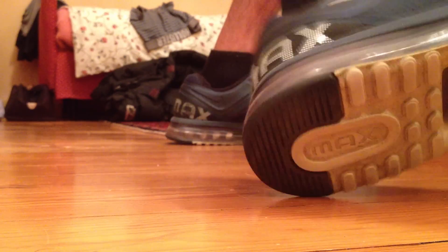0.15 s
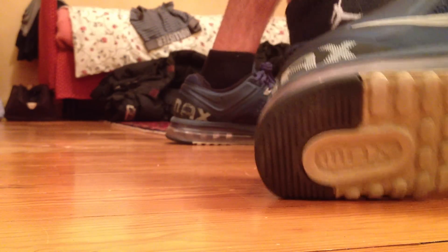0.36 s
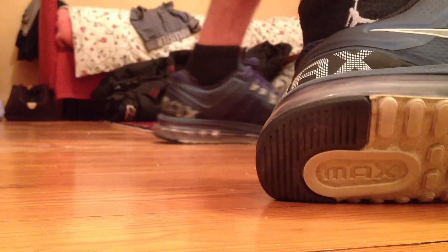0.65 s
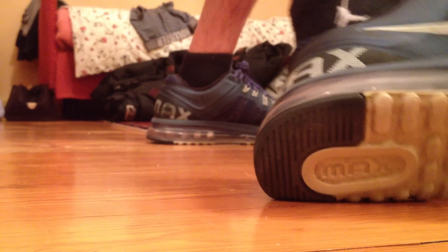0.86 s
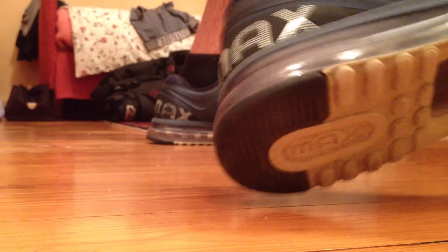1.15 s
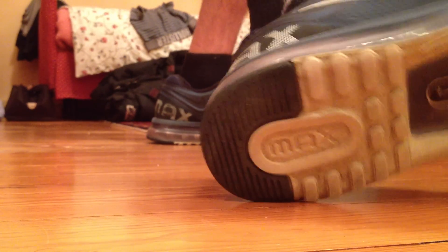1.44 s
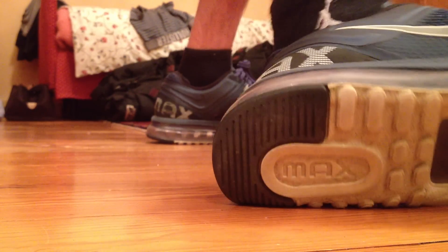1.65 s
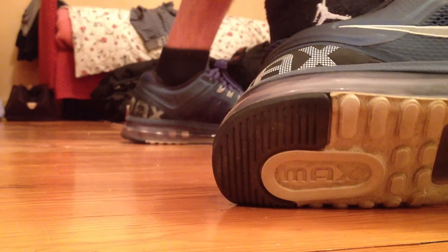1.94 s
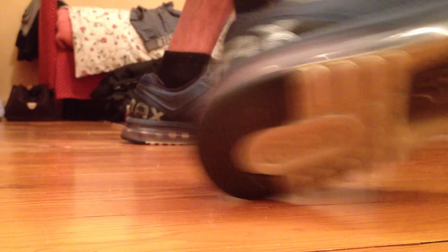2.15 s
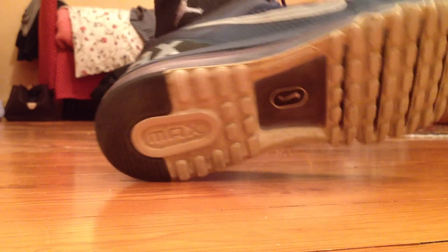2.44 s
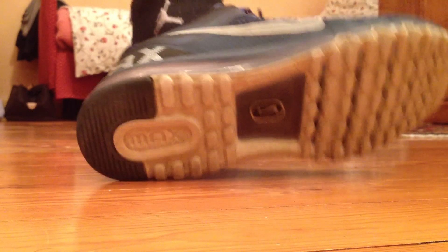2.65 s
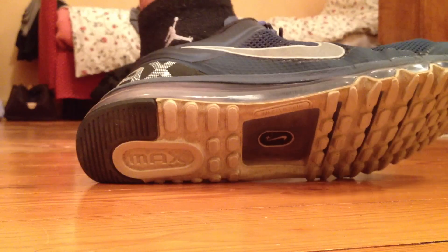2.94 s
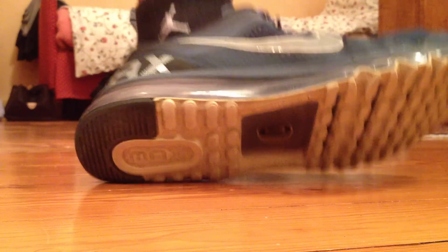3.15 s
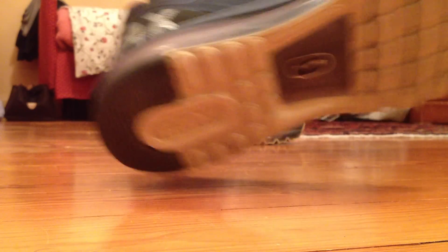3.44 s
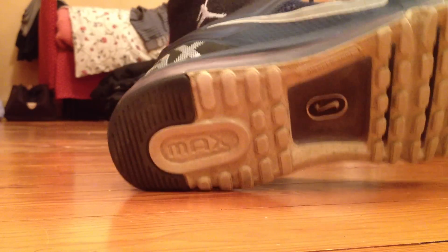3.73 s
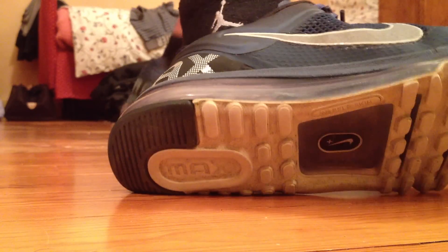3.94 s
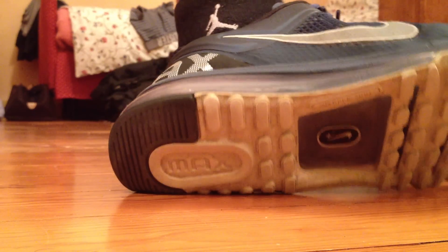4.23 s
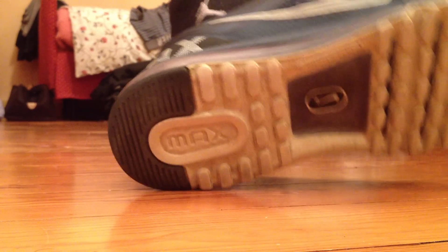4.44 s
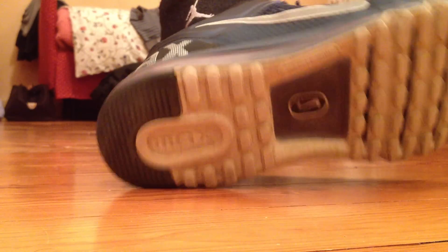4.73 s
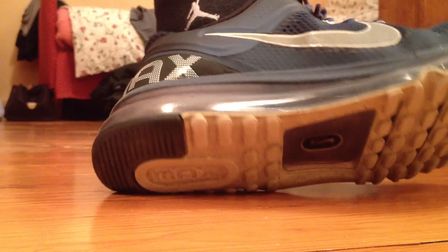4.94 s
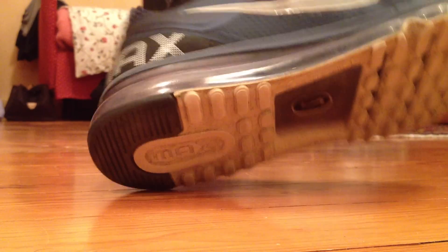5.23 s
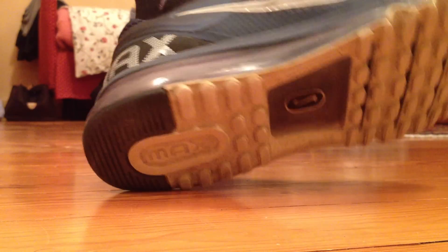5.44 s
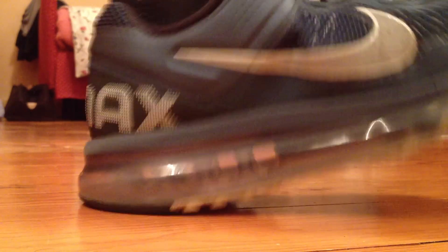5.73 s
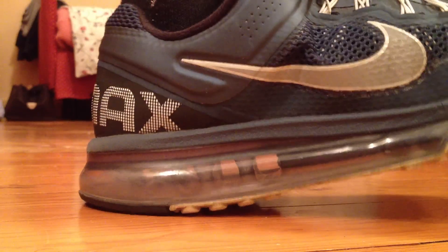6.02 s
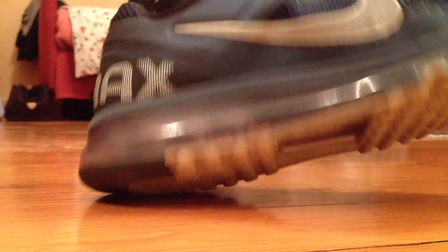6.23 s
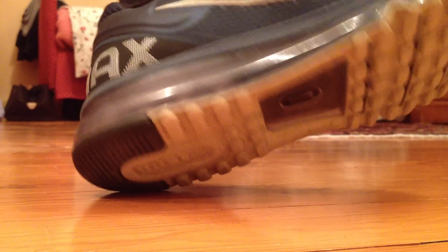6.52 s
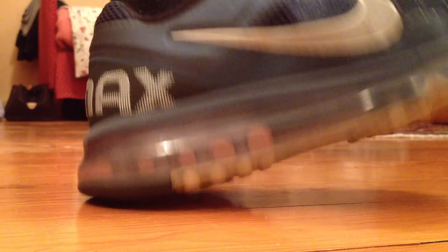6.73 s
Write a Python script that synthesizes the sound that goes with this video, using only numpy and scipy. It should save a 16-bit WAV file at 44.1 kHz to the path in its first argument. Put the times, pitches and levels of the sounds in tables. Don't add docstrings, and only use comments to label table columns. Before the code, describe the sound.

A rubber shoe sole rocks on a wooden floor, giving sharp squeaky snaps about once a second, gritty rubs, soft heel thumps and one flat clap.

```python
import sys
import numpy as np
from scipy import signal
from scipy.fft import rfft, irfft, next_fast_len
from scipy.io import wavfile
from scipy.ndimage import uniform_filter1d, minimum_filter1d

SR = 44100
rng = np.random.default_rng(int(sys.argv[2]) if len(sys.argv) > 2 else 0)


def invert_db(x):
    u = np.asarray(x, float) / 20
    return 10 ** u


def waveform_to_disk(signal):
    frames = np.transpose(np.atleast_2d(signal))
    scaled = np.clip(frames, -1, 1) * 32767
    samples = np.round(scaled).astype(np.int16)
    wavfile.write(sys.argv[1], SR, samples)


N = 303048

# pitch_hz, level_db (per Hz)
STILL_SPECTRUM = [(24, -49), (40, -25.5), (124, -3.5), (147, -5), (392, -6.5), (733, -8), (13100, -24.5),
                  (14800, -20), (16000, -39)]
STILL_DB = -71.5
# start_s, level_db (added to the background)
LEG_RUSTLE = [(0.1, 1.5), (1.4, -1), (1.899, 1), (2.55, -4), (2.9, 1), (3.5, -0.5), (4.7, 1), (5.5, 3.5),
              (6.3, 3), (6.55, -1), (6.8, 3.5)]

# delay_s, level_db
ECHOES = [(.0009, -16.5), (.0024, -15.5), (.0053, -12), (.0062, -20)]
# pitch_hz, t60_s
ROOM_DECAY = [(150, 0.65), (400, 0.42), (1000, 0.4), (2500, 0.44), (3600, 0.48), (6000, .4), (13000, 0.32)]
# pitch_hz, level_db
ROOM_TONE = [(150, -4), (390, 1), (520, 6), (1000, 2.5), (2000, 1.5), (3300, -8.5), (4500, -3), (9000, 1.5)]
ROOM_DB = -5.5
FLUTTER_S, FLUTTER_DB = 0.0175, -6

# pitch_hz, level_db
SOLE_SLAP_SPECTRUM = [(80, -40), (250, -10), (500, -6), (1100, 1), (1800, 1), (2800, -3), (4500, -13),
                      (6200, -18)]
SOLE_SLAP_S, SOLE_SLAP_DB, SOLE_SLAP_ROOM_DB = 5.156, -11, 6.5

# pitch_hz, level_db
RUMBLE = [(60, -28), (110, -14), (170, -3), (240, 3.5), (330, -6), (500, -4), (750, -12), (1200, -40)]
# pitch_hz, level_db
DRAG = [(300, -23.5), (600, -2.5), (1000, 3), (1600, 1), (2200, -6.5), (3500, -30.5)]
# pitch_hz, level_db
SCRAPE = [(1200, -29.5), (2000, -1), (2800, -0.5), (4000, -1), (5200, -9), (8000, -25)]
# pitch_hz, level_db
HISS = [(3500, -25), (5500, 0.5), (8500, 2), (12000, -11), (16000, -3.5)]
# level_db (against the slip), tilt_db (per brightness)
SLIP_LAYERS = [(-0.76, -7.5), (-1.54, 0.8), (-6, 7.5)]
# start_s, length_s, load_db (on the boards), slip_db,
# brightness (-1 dull to 1 bright)
SLIDES = [(0.0, 0.13, -73, -72.5, 0.26), (.25, 0.11, -56, -67, -0.35), (.352, 0.27, -61, -65.5, -0.1),
          (.65, 0.23, -60, -73.5, -0.015), (1.3, 0.16, -81, -72.5, -0.26),
          (1.51, 0.27, -55.5, -66.5, -0.34), (1.8, .17, -70, -76.5, .1), (1.975, .045, -58.5, -68, .1),
          (2.7, 0.22, -64, -72, -0.48), (3.87, .15, -60, -66, 0.52), (4.03, 0.072, -50, -53.5, .3),
          (4.1, 0.33, -59.5, -69, -0.26), (4.4, 0.087, -70, -56, 0.82), (4.48, 0.37, -76, -71, 0.27),
          (4.81, 0.14, -61.5, -65.5, -0.25), (5.3, 0.19, -73, -63, -0.3), (.945, .15, -77.5, -57, .95),
          (3.56, .14, -76.5, -69, 0.36), (4.34, 0.071, -77, -48.5, 0.99), (2.3, .1, -73.5, -73, .5),
          (4.768, .045, -66, -67, -.5)]
# start_s, length_s, load_db, slip_db, brightness (-1 to 1)
SWEEPS = [(.89, 0.049, -52, -49, 0.19), (2.018, 0.058, -56, -52, 1), (3.09, 0.084, -58.5, -55, 0.9),
          (4.27, .034, -46.5, -57, -0.4), (4.88, 0.29, -77, -68.5, 0.93), (5.62, .22, -60, -58, -.1),
          (5.712, 0.063, -46, -46, -.6), (5.85, 0.22, -75, -75.5, 0.2), (6.03, 0.23, -70, -64.5, 0.11),
          (6.25, 0.23, -71.5, -66.5, -0.13), (6.62, 0.19, -64.5, -77.5, -0.21)]
# start_s, length_s, load_db, slip_db, brightness (-1 to 1)
PULLS = [(.75, 0.12, -60, -63.5, 0.26), (.927, 0.012, -45, -41.5, -0.045), (2.074, 0.0077, -51.5, -46, -.1),
         (2.9, 0.21, -65.5, -71.5, .1), (3.158, .014, -45.5, -55.5, -0.11), (3.7, .18, -65, -68.5, .1),
         (4.305, .032, -50, -41, .1), (6.845, .027, -55, -56, -.6), (6.72, 0.16, -55, -61.5, -0.26)]
# peak_place (share of length), start_db, end_db (against the peak)
SLIDE_SHAPE = (0.12, -2.5, -11)
SWEEP_SHAPE = (.48, -12.5, -11.5)
PULL_SHAPE = (1, -16.5, -2.5)

# start_s, level_db (peak), pitch_hz
BUMPS = [(1.5448, -46.5, 240), (1.5961, -34.5, 331), (1.6244, -39, 280), (1.7159, -44, 414),
         (2.091, -37.5, 280), (3.9253, -40, 309), (4.6192, -49, 213), (4.77, -55, 210), (5.1575, -38, 408),
         (6.6732, -50, 380), (6.685, -54, 420), (6.6957, -56.5, 258)]
# start_s, level_db (peak), pitch_hz
TAPS = [(0.3621, -50, 223), (0.4117, -47, 251), (0.6378, -54.5, 183), (0.9146, -40.5, 342),
        (1.5189, -56, 199), (1.6605, -51, 372), (1.9725, -45, 328), (2.3082, -43.5, 228.2),
        (2.7223, -55, 185), (2.7891, -40, 322.6), (3.1766, -38, 435), (3.861, -49, 303), (4.0434, -42, 400),
        (4.0611, -48, 289), (4.1587, -41.5, 304), (4.1729, -39.5, 271), (4.1799, -42, 197),
        (4.2212, -46.5, 279), (4.2728, -46, 366), (4.808, -48, 209.2), (4.8381, -47, 251),
        (5.4532, -63.5, 226), (5.7206, -37, 451), (6.0641, -55, 269)]
BUMP_KNOCK_DB, TAP_KNOCK_DB = -19, -4.5

# start_s, level_db (peak), slap_db (against the peak)
HEELS = [
    (0.1772, -27.5, -3),
    (1.238, -30, -0.5),
    (3.553, -29, 2),
]
# pitch_hz, level_db, t60_s
BOARD_MODES = [(109.8, -11.5, 0.044), (212, -36, 0.033), (321.2, -13, 0.11), (696, -33.5, 0.034)]

# start_s, level_db (peak), pitch_hz (ring), edge_hz (upper limit),
# tick_db (against the peak)
RELEASES = [
    (0.9367, -27, 2800, 4900, -14),
    (0.9383, -28, 2800, 4900, -15.5),
    (0.9405, -17, 2800, 4300, -21.5),
    (0.9418, -3.5, 2750, 3400, -19),
    (2.0838, -16.5, 2806, 4300, -13),
    (2.0863, -11.5, 2606, 4300, -13.5),
    (2.0886, -4, 2866, 3500, -21),
    (3.1747, 2, 2904, 4250, -19.5),
]
# start_s, level_db (peak), pitch_hz, edge_hz, tick_db
CHATTER = [
    (4.3148, -31, 2700, 4500, -14),
    (4.3270, -24.5, 2700, 4500, -14),
    (4.3298, -28, 2600, 4500, -14),
    (4.3326, -27, 2800, 4500, -17),
    (4.336, -24, 2800, 4500, -15),
    (4.3373, -5.5, 2700, 4700, -12),
    (4.3385, -13, 2500, 4500, -12),
]
# start_s, level_db (peak), pitch_hz (ring), tick_db (against the peak)
LUGS = [(0.0064, -46, 1350, -19), (0.3143, -50.5, 1690, -18), (0.356, -43.5, 2150, -31),
        (0.4092, -30, 2600, -20.5), (0.6145, -50.5, 2300, -27), (0.6504, -25, 2525, -6.5),
        (0.6869, -31, 3480, -10), (0.7372, -43.5, 2260, -24), (0.8028, -28, 2460, -11),
        (0.8215, -34.5, 2470, -5), (1.5323, -43.5, 2270, -24), (1.566, -26.5, 2580, -19.5),
        (1.7132, -44.5, 2504, -1.5), (1.7295, -46.5, 2460, -5), (1.984, -35, 2290, -17),
        (2.7511, -40.5, 3400, -15), (2.7646, -29.5, 2960, -15), (2.9069, -37, 2450, -11),
        (2.9352, -53.5, 2520, -16.5), (2.9563, -51, 2660, -19), (3.8455, -32.5, 2550, -18),
        (3.893, -45.5, 2100, -14), (3.941, -54, 3100, 1.5), (4.8278, -48.5, 2840, -11),
        (4.8395, -30, 3060, -18), (5.5747, -52.5, 1440, -20), (5.6521, -44, 2720, -11),
        (5.684, -43.5, 2670, -12), (5.7227, -36, 1940, -5), (6.0774, -50, 1920, -10)]
# start_s, level_db (peak), pitch_hz (ring)
CRACKLES = [(0.8522, -46.5, 2610), (0.8592, -50.5, 2380), (0.8821, -50.5, 2770), (0.9012, -37.5, 2530),
            (0.915, -31, 2325), (0.9205, -37.5, 2575), (2.0193, -38, 2740), (2.0264, -46, 3170),
            (2.039, -43.5, 2900), (2.0461, -46, 2680), (2.0646, -38.5, 2445), (2.0714, -45.5, 2505),
            (2.0798, -38.5, 2685), (3.0336, -48.5, 2320), (3.0834, -52.5, 2850), (3.09, -50.5, 2740),
            (3.0994, -45, 2370), (3.102, -44.5, 2570), (3.1207, -42.5, 2760), (3.1282, -38, 2730),
            (3.1315, -30, 2625), (3.1392, -34, 2580), (4.0286, -31.5, 2045), (4.0434, -33.5, 2215),
            (4.054, -38.5, 1985), (4.0769, -39, 2390)]
CRACKLE_TICK_DB, LUG_EDGE_HZ = -5.5, 5100
RELEASE_LOW_HZ, CHATTER_LOW_HZ, LUG_LOW_HZ = 350, 1600, 600
TICK_HZ, TICK_SPREAD = 5300, 0.07
KNOCK_DB, KNOCK_GROWTH = -54.5, 0.35


def evened(x):
    return x / np.sqrt(np.mean(x ** 2) + 1e-20)


def read(points, hz):
    f, value = np.transpose(points)
    return np.interp(np.log(hz + 1), np.log(f + 1), value)


def add(mix, s, sound):
    part = mix[round(s * SR):][:len(sound)]
    part += sound[:len(part)]


def colour(x, points):
    size = next_fast_len(len(x))
    gain = invert_db(read(points, np.fft.rfftfreq(size, 1 / SR)))
    return irfft(rfft(x, size) * gain, size)[:len(x)]


def ring(hz, t60, rise, size):
    t = np.arange(size) / SR
    x = -np.sin(2 * np.pi * hz * t) * invert_db(-60 * t / t60) * (1 - np.exp(-t / rise))
    return x / abs(x).max()


def push(hz):
    t = np.arange(int(3 / 2 / hz * SR)) / SR
    return np.sin(2 * np.pi * hz * t) * signal.windows.tukey(len(t), 0.5)


def still_room():
    level_db = STILL_DB + np.interp(np.arange(N) / SR, *np.transpose(LEG_RUSTLE))
    return invert_db(level_db) * evened(colour(rng.standard_normal(N), STILL_SPECTRUM))


def room(x):
    taps = np.zeros(SR)
    at = np.arange(100, SR - 20, 16) + rng.integers(0, 16, (SR - 105) // 16)
    taps[at] = rng.choice([-1., 1.], len(at))
    hz, t, z = signal.stft(taps, SR, nperseg=256)
    decay = invert_db(-60 * t / read(ROOM_DECAY, hz)[:, None])
    tail = signal.istft(z * decay, SR, nperseg=256)[1][:SR]
    tail = colour(tail / np.linalg.norm(tail), ROOM_TONE) * invert_db(ROOM_DB)
    tail *= np.minimum(1, np.arange(SR) / (0.0013 * SR))
    return signal.fftconvolve(x, tail)[:N]


def flutter(x):
    gap = np.zeros(round(FLUTTER_S * SR) - 1)
    return signal.lfilter([1], np.r_[1, gap, -invert_db(FLUTTER_DB)], x) - x


def echoes(x):
    taps = np.zeros(1000)
    for s, db in ECHOES:
        taps[round(s * SR)] += invert_db(db)
    return signal.oaconvolve(x, taps)[:N]


def sole_slap():
    out = np.zeros(N)
    hz = abs(np.fft.fftfreq(4096, 1 / SR))
    octaves_above = np.log2(np.maximum(1, hz / SOLE_SLAP_SPECTRUM[-1][0]))
    log_gain = np.log(invert_db(read(SOLE_SLAP_SPECTRUM, hz) - 26 * octaves_above))
    minimum_phase = np.exp(np.conj(signal.hilbert(log_gain)))
    clap = np.fft.ifft(minimum_phase).real[:1500]
    add(out, SOLE_SLAP_S, invert_db(SOLE_SLAP_DB) * clap / abs(clap).max())
    return out


def grit(per_s, spread_db):
    size = invert_db(spread_db * np.minimum(rng.exponential(1, N), 5)) * rng.standard_normal(N)
    return size * (rng.random(N) < per_s / SR)


def rubs():
    layers = np.array([evened(colour(grit(1200, 0.74), RUMBLE)),
                       evened(colour(grit(3000, 2.5), DRAG)),
                       evened(colour(grit(5000, 0.92), SCRAPE)),
                       evened(colour(grit(15000, 0.82), HISS))])
    out = np.zeros(N)
    kinds = (SLIDES, SLIDE_SHAPE), (SWEEPS, SWEEP_SHAPE), (PULLS, PULL_SHAPE)
    for rows, (peak, start_db, end_db) in kinds:
        for s, length, load_db, slip_db, brightness in rows:
            at = round(max(s, 0) * SR)
            slip_dbs = [slip_db + db + brightness * tilt_db for db, tilt_db in SLIP_LAYERS]
            stroke = invert_db([load_db] + slip_dbs) @ layers[:, at:at + round(length * SR)]
            size = len(stroke)
            place = np.arange(size) / SR / length
            shape_db = np.interp(place, [0, np.clip(peak, 0, 1), 1], [start_db, 0, end_db])
            fade = signal.windows.tukey(size, min(1, 300 / size))
            add(out, at / SR, stroke * invert_db(shape_db) * fade)
    return out


def bumps():
    out = np.zeros(N)
    sag = invert_db(-15.0) * ring(57, 0.016, 0.004, size=3000)
    knock = ring(640, 0.0053, 0.00023, size=3000) + invert_db(-4.0) * ring(930, 0.0055, 0.0002, size=3000)
    for rows, knock_db in (BUMPS, BUMP_KNOCK_DB), (TAPS, TAP_KNOCK_DB):
        for s, db, hz in rows:
            add(out, s, invert_db(db) * push(hz))
            add(out, s, invert_db(db) * (sag + invert_db(knock_db) * knock))
    return out


def heels():
    out = np.zeros(N)
    boards = sum(invert_db(db) * ring(hz, t60, 0.005, size=9000) for hz, db, t60 in BOARD_MODES)
    slap = ring(460, 0.0042, 0.00026, size=9000)
    slap -= invert_db(-6.5) * ring(1150, 0.00195, 0.00035, size=9000)
    slap += invert_db(-6.5) * ring(1990, 0.00143, 0.0002, size=9000)
    slap += invert_db(-17) * ring(3560, 0.00065, 0.00018, size=9000)
    for s, db, slap_db in HEELS:
        add(out, s, invert_db(db + slap_db) * slap)
        add(out, s + 0.00069, invert_db(db) * push(190))
        add(out, s, invert_db(db) * boards)
    return out


def snaps():
    rows = [(*row, RELEASE_LOW_HZ) for row in RELEASES]
    rows += [(*row, CHATTER_LOW_HZ) for row in CHATTER]
    rows += [(s, db, hz, LUG_EDGE_HZ, tick_db, LUG_LOW_HZ) for s, db, hz, tick_db in LUGS]
    rows += [(s, db, hz, LUG_EDGE_HZ, CRACKLE_TICK_DB, LUG_LOW_HZ) for s, db, hz in CRACKLES]
    out = np.zeros(N)
    t = np.arange(300) / SR
    for s, db, hz, edge_hz, tick_db, low_hz in rows:
        noise = rng.standard_normal(300)
        lug = ring(1.073 * hz, 0.0017, 0.0012, size=1500)
        lug += invert_db(-3.5) * ring(0.74 * hz, 0.0014, 0.0001, size=1500)
        knock_db = KNOCK_DB + 40 + (KNOCK_GROWTH - 1) * (db + 40)
        knock = invert_db(knock_db) * ring(980, 0.0041, 0.0002, size=1500)
        soft = signal.cheby1(5, 1, 0.95 * edge_hz, fs=SR, output="sos")
        deep = signal.butter(2, low_hz, "high", fs=SR, output="sos")
        body = signal.sosfilt(np.r_[soft, deep], lug + knock)

        tick = ring(TICK_HZ * (1 + TICK_SPREAD * noise[0]), 0.00076, 0.0001, size=300)
        tick += invert_db(-8) * noise * invert_db(-60 * t / 0.0056)
        bright = signal.butter(2, [1.2 * hz, 11000], "band", fs=SR, output="sos")
        tick = signal.sosfilt(bright, tick)
        add(out, s - 0.0003, -invert_db(db) * body / abs(body).max())
        add(out, s, -invert_db(db + tick_db) * tick / abs(tick).max())
    return out


def scene():
    still, clap, rub = still_room(), sole_slap(), rubs()
    thuds, clicks = bumps() + heels(), snaps()
    bass = signal.sosfiltfilt(signal.butter(2, 400, fs=SR, output="sos"), thuds)
    late_bass = np.r_[np.zeros(330), bass[:-330]]
    send = clicks + invert_db(SOLE_SLAP_ROOM_DB) * clap + invert_db(-5.5) * rub
    send += invert_db(0.5) * (thuds - bass) + invert_db(-1.5) * late_bass
    wet = echoes(clicks + clap) + flutter(bass) + room(send)
    return (clicks + clap + thuds + rub + wet + still)[None]


def top_cut(x):
    return signal.sosfilt(signal.butter(12, 16460, fs=SR, output="sos"), x)


def record(dry):
    mic = signal.sosfilt(signal.butter(4, 80, "high", fs=SR, output="sos"), dry)
    peak = -minimum_filter1d(-abs(mic), size=81)
    gain = np.minimum(1, invert_db(-3.1) / (peak + 1e-9))
    held = mic * uniform_filter1d(gain, size=41)
    finished = signal.oaconvolve(held, signal.firwin(255, 15450, fs=SR)[None], "same")
    return top_cut(finished)


dry = scene()
out = record(dry)
waveform_to_disk(out)
```